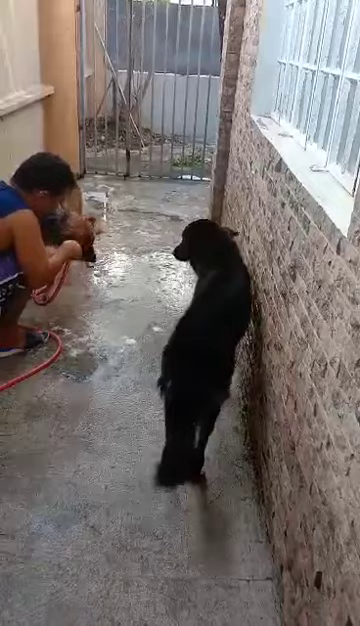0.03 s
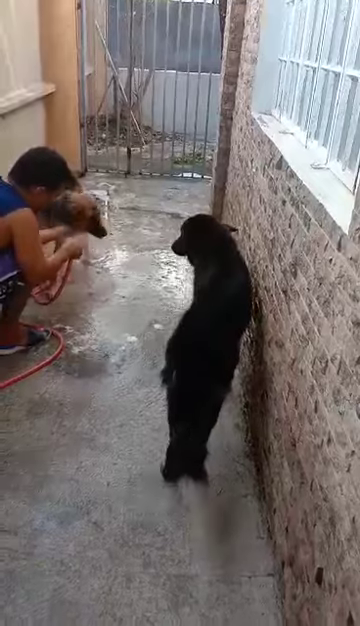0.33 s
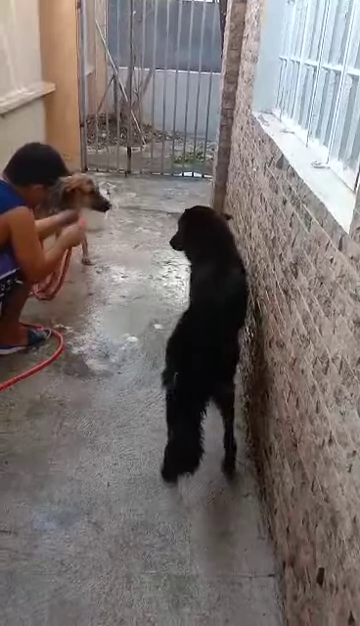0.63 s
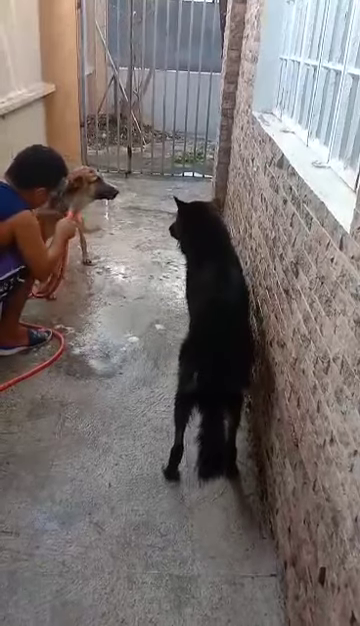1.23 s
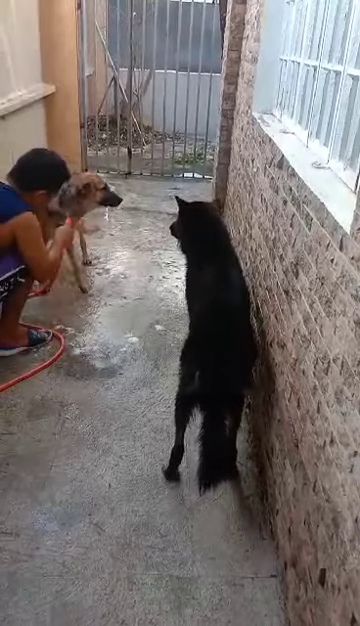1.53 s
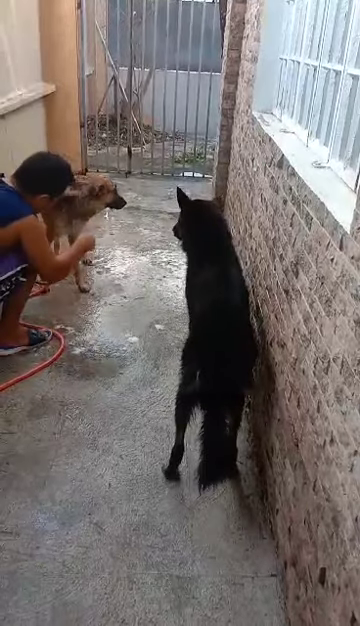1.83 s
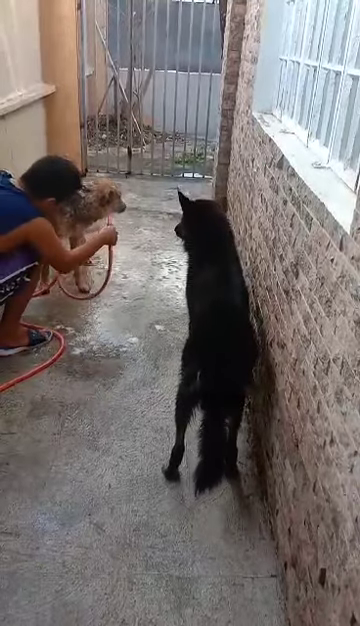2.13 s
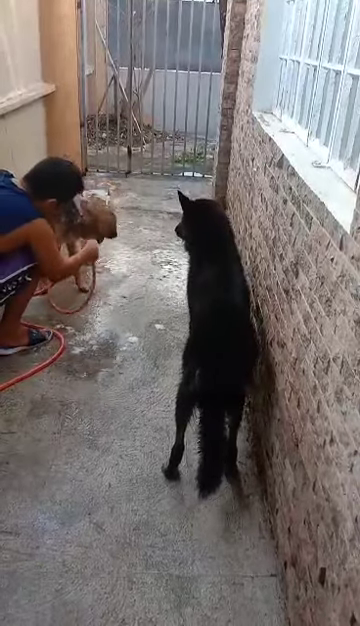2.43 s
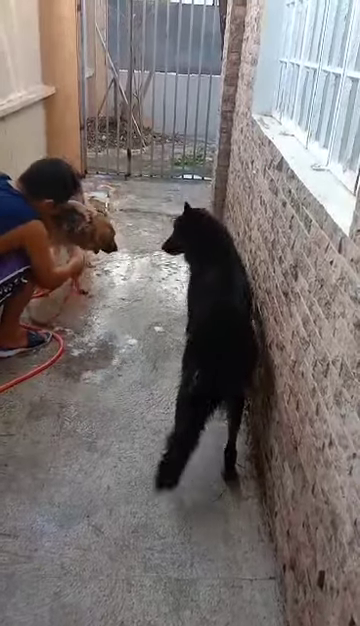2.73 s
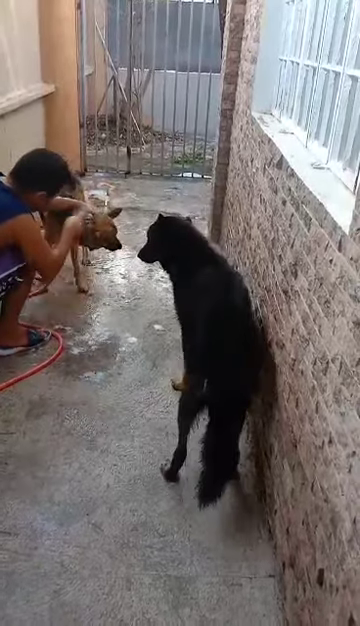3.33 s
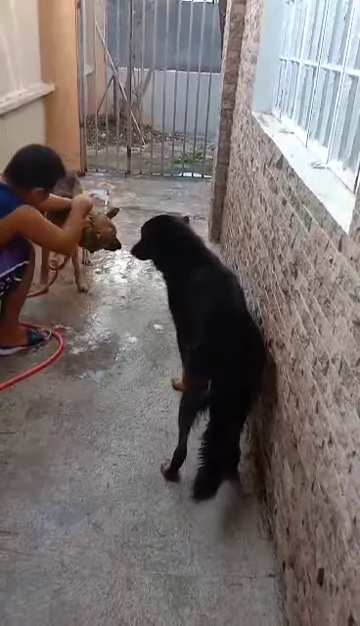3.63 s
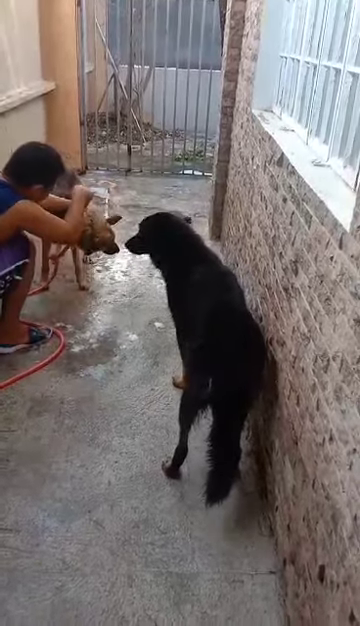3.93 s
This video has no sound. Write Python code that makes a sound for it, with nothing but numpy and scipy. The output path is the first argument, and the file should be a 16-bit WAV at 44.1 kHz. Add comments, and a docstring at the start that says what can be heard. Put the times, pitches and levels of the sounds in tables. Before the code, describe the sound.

Water spraying from a hose, hissing and splattering on a wet dog and concrete.

```python
"""Hosing a wet dog in a concrete yard

The spray hisses throughout: countless droplet impacts sum to noise. As the jet wanders over coat,
hand and ground it splatters, gargles and drums in surges, with impacts giving clicks and bubbles
ringing as damped oscillators. Close walls reflect the splashing and larger hollows resonate briefly.
A faint low hum comes and goes over a quiet outdoor background."""
import sys
import numpy as np
from scipy import signal
from scipy.fft import rfft, irfft
from scipy.io import wavfile
from scipy.ndimage import uniform_filter1d

SR = 44100
rng = np.random.default_rng(int(sys.argv[2]) if len(sys.argv) > 2 else 0)


def materialize(psi):
    """Save the field psi as 16-bit PCM at rate SR to the path in sys.argv[1].

    A 1-D psi becomes a single channel; in a 2-D psi each row is a channel.
    """
    bounded = np.clip(np.atleast_2d(psi).T, -1, 1)
    quanta = np.round(bounded * 32767).astype(np.int16)
    wavfile.write(sys.argv[1], SR, quanta)


N = 176400

# Reverberation time of the yard: frequency_hz, t60_s
YARD_DECAY = [(100, 0.18), (1000, 0.22), (3000, 0.39), (7000, 0.071), (13000, 0.52)]
# Stereo width of spray and mist, side relative to mid: frequency_hz, gain_db
SIDE_SPECTRUM = [(3600, -77), (4300, -24.5), (5200, -5), (6200, -4), (8000, -2), (11500, -2), (12600, -7),
                 (13000, -17)]
# Envelope of the fine spray: time_s, level_db
SPRAY_ENVELOPE = [(0.0, -32.5), (0.05, -30.5), (0.1, -33), (0.24, -32), (0.33, -38), (0.42, -33.5),
                  (0.5, -39), (0.59, -32), (0.95, -38), (1.22, -42), (1.33, -38), (1.7, -32.5), (1.92, -39),
                  (2.08, -36.5), (2.32, -38.5), (2.41, -28.5), (2.45, -32.5), (2.49, -30), (2.56, -34),
                  (2.62, -31.5), (2.74, -41), (2.94, -31), (3.02, -38.5), (3.09, -28.5), (3.14, -31),
                  (3.27, -32.5), (3.44, -36.5), (3.54, -34), (3.59, -31.5), (3.8, -30.5), (3.91, -31.5),
                  (4.0, -31.5)]
# Spectrum of the fine spray: frequency_hz, gain_db
SPRAY_SPECTRUM = [(1500, -28), (2900, -14.5), (3800, -9.5), (4600, -9), (5200, -0.5), (5600, 0), (6600, -1),
                  (7350, -6), (7750, -14), (9000, -23), (13000, -16.5)]
# Lower edge of the hiss, climbing as the spray thins: time_s, cutoff_hz
SPRAY_CUTOFF = [(0.62, 2900), (0.8, 4500), (1.0, 4640), (1.2, 5020), (1.36, 4340), (1.48, 2950),
                (1.9, 3400), (2.14, 4100), (2.31, 5000), (2.37, 3000)]
# Envelope of the finest mist: time_s, level_db
MIST_ENVELOPE = [(0.0, -32.5), (0.17, -37.5), (0.36, -34.5), (0.49, -42), (0.56, -37), (1.14, -41.5),
                 (1.69, -34.5), (1.91, -44.5), (2.02, -41.5), (2.28, -41), (2.43, -34.5), (2.6, -34),
                 (2.74, -45.5), (2.92, -40), (3.1, -36), (3.2, -36.5), (3.29, -33), (3.52, -40.5),
                 (3.68, -31.5), (4.0, -35.5)]
# Spectrum of the mist: frequency_hz, gain_db
MIST_SPECTRUM = [(3000, -45), (6500, -29), (7800, -10.5), (9000, -8.5), (10200, -5), (11800, -0.5),
                 (12500, 5), (13000, -4)]
# Splatter of the landing jet: time_s, level_db
SPLATTER_ENVELOPE = [(0.0, -33.5), (0.07, -34), (0.16, -38), (0.39, -44.5), (0.43, -37.5), (0.5, -52.5),
                     (0.61, -41), (0.88, -57), (1.08, -49), (1.15, -56), (1.38, -48.5), (1.49, -35.5),
                     (1.61, -38), (1.69, -37), (1.88, -43.5), (1.96, -40.5), (2.04, -50), (2.15, -47.5),
                     (2.28, -56), (2.39, -34.5), (2.52, -31.5), (2.61, -34.5), (2.74, -49.5), (2.92, -44.5),
                     (3.03, -44.5), (3.1, -33), (3.25, -30.5), (3.42, -39.5), (3.55, -36.5), (3.69, -32),
                     (3.85, -33.5), (3.9, -36.5), (4.0, -33.5)]
# Spectrum of the splatter: frequency_hz, gain_db
SPLATTER_SPECTRUM = [(900, -13), (1500, -3), (1900, -1.5), (2150, -3.5), (2400, -2.5), (2600, -2.5),
                     (2900, 1), (3400, 1), (3750, -1.5), (4250, -9.5), (4900, 2), (12000, -18)]
# Jet churning a pocket of water: time_s, relative_level_db, resonance_hz
GARGLE_CURVES = [(0.0, -37.5, 1380), (0.09, -34.5, 1410), (0.2, -46.5, 1460), (0.29, -39.5, 1330),
                 (0.48, -48, 1350), (0.58, -57, 1650), (0.75, -59, 1430), (1.25, -63, 1490),
                 (1.31, -42.5, 1570), (1.44, -58, 1540), (1.51, -43.5, 1110), (1.68, -46.5, 1360),
                 (1.78, -35, 1385), (1.93, -48.5, 1440), (1.97, -41.5, 1530), (2.05, -50.5, 1480),
                 (2.16, -46.5, 1420), (2.28, -54.5, 1680), (2.37, -41.5, 1380), (2.56, -39, 1670),
                 (2.6, -39, 1370), (2.67, -39, 1480), (2.78, -57.5, 1200), (2.9, -53, 1220),
                 (2.99, -41, 1360), (3.02, -49.5, 1240), (3.13, -34.5, 1460), (3.39, -38.5, 1324),
                 (3.44, -40, 1250), (3.49, -40, 1300), (3.58, -41.5, 1200), (3.78, -37, 1410),
                 (3.83, -33, 1310), (3.89, -42, 1270), (4.0, -35, 1300)]
# Heavy water on the coat: time_s, relative_level_db, resonance_hz
DRUMMING_CURVES = [(0.0, -45.5, 1010), (0.06, -38, 1030), (0.15, -56, 1080), (0.33, -50, 860),
                   (0.44, -68, 1110), (0.52, -62, 626), (0.59, -49.5, 637), (0.67, -63, 686),
                   (1.25, -66, 785), (1.43, -64.5, 1000), (1.67, -43.5, 890), (1.79, -47, 930),
                   (1.83, -65, 1020), (2.32, -65.5, 1040), (2.46, -41, 1010), (2.6, -39, 830),
                   (2.68, -65, 1040), (2.88, -63.5, 1020), (3.2, -39.5, 1090), (3.3, -39, 900),
                   (3.44, -54.5, 927), (3.52, -46.5, 900), (3.65, -38.5, 970), (3.78, -45.5, 700),
                   (3.84, -51, 1050), (3.88, -44.5, 960), (4.0, -43.5, 893)]
# Spectrum of the drumming bubbles: frequency_hz, gain_db
DRUMMING_SPECTRUM = [(120, -28), (300, -29), (450, -12.5), (600, 3.5), (750, 4), (950, 6), (1200, 8.5),
                     (1800, -3.5), (3000, -34)]
# Swells of the low hum: start_s, length_s, level_db
HUM_SWELLS = [(0, 0.16, -49), (1.785, .3, -50), (2.477, 0.28, -48), (2.964, 0.32, -48.5),
              (3.405, 0.094, -46), (3.547, 0.25, -49), (3.798, 0.23, -49.5)]
# Spectrum of the noise in the hum: frequency_hz, gain_db
HUM_SPECTRUM = [(20, -22), (45, -15), (65, 5), (90, 5), (115, 15), (170, -13), (300, -47), (900, -70)]
# Spectrum of the outdoor background: frequency_hz, gain_db
BACKGROUND_SPECTRUM = [(20, -31), (50, -18), (90, -2.5), (140, 4.5), (200, -1), (300, -10), (700, -14),
                       (1400, -42), (4000, -14), (14000, -38)]
# Moments when the splash turns hollow: start_s, length_s, centre_hz, gain_db
HOLLOW_BANDS = [(0.378, 0.14, 2070, -14.5), (0.61, 0.17, 2160, -11), (1.11, 0.13, 4300, 5),
                (1.79, 0.12, 2150, -6), (2.18, 0.21, 2450, -3), (2.695, 0.43, 2200, -6.5),
                (3.181, 0.07, 600, -7), (3.33, 0.092, 680, -7)]
# Hollows ringing under the jet: start_s, length_s, pitch_hz, width_hz, level_db
GLUG_RESONANCES = [(0.475, 0.2, 1550, 35, -46.5), (0.506, 0.1, 300, 201, -54),
                   (0.531, 0.15, 428, 26.2, -45.5), (0.554, 0.14, 3110, 70, -44.5),
                   (0.758, 0.077, 2860, 35, -51), (1.637, 0.16, 417, 150, -51),
                   (2.389, 0.074, 575, 70, -42), (2.39, 0.31, 428, 167, -50.5),
                   (2.864, .2, 1171, 34.8, -47), (2.88, 0.23, 686, 39.4, -50), (2.845, 0.21, 387, 120, -52),
                   (3.081, .1, 440, 152, -45), (3.235, 0.11, 483, 160, -49),
                   (3.384, 0.14, 467, 97.2, -55.5), (3.614, 0.26, 565, 50, -47),
                   (3.64, 0.52, 442, 100, -48), (3.958, 0.063, 1220, 50, -37)]


def amp(db):
    """Amplitude grows tenfold for every 20 decibels."""
    return 10 ** (np.asarray(db) / 20)


def unit(x):
    """Normalisation brings a signal to rms 1."""
    return x / np.sqrt(np.mean(x ** 2) + 1e-20)


def along(table):
    """Linear interpolation in time gives each column a value at every sample."""
    time_s, *columns = np.transpose(table)
    return [np.interp(np.arange(N) / SR, time_s, column) for column in columns]


def across(table, hz):
    """Interpolation on a log-frequency axis reads a table between its points."""
    points_hz, values = np.transpose(table)
    return np.interp(np.log(hz + 1), np.log(points_hz + 1), values)


def tint(x, spectrum):
    """Linear filtering multiplies each frequency by its own gain."""
    gain = amp(across(spectrum, np.fft.rfftfreq(2 * N, 1 / SR)))
    return irfft(rfft(x, 2 * N) * gain)[:N]


def wander(rate_hz):
    """Low-pass filtered noise is a smooth random fluctuation, here of rms 1."""
    low_pass = np.exp(-(np.fft.rfftfreq(N, 1 / SR) / rate_hz) ** 2)
    return unit(irfft(rfft(rng.standard_normal(N)) * low_pass, N))


def steady(x, samples=5000):
    """Division by the running rms removes slow level changes and leaves the fast grain."""
    power = uniform_filter1d(uniform_filter1d(x ** 2, samples), samples)
    return x / np.sqrt(abs(power) + 1e-20)


def resonate(x, hz, width_hz):
    """Two resonators in cascade, each width_hz wide, pass a steep band around a fixed or moving pitch."""
    carrier = np.exp(2j * np.pi * np.cumsum(hz * np.ones(N)) / SR)
    pole = np.exp(-np.pi * width_hz / SR)
    baseband = signal.lfilter([(1 - pole) ** 2], [1, -2 * pole, pole * pole], x / carrier + 1e-18)
    return (carrier * baseband).real


def drops(per_s, spread_db):
    """Independent impacts form a Poisson train of impulses, many small and a few large."""
    hits = rng.random(N) < per_s / SR
    return hits * rng.choice([-1., 1.], N) * amp(spread_db * np.minimum(rng.exponential(1, N), 4))


def yard(x, wet_db, patterns=7):
    """Wall reflections decay exponentially; cycling through echo patterns stands for the jet's motion."""
    shape = (patterns, SR // 2)
    echoes = rng.standard_normal(shape) * (rng.random(shape) < 2500 / SR)
    echoes *= np.arange(SR // 2) > .004 * SR  # travel time of the earliest reflection
    hz, t, spectra = signal.stft(echoes, SR, nperseg=256)
    decay = amp(-60 * t / across(YARD_DECAY, hz)[:, None])
    tails = signal.istft(spectra * decay, SR, nperseg=256)[1]
    place = np.arange(N) // (SR // 12) % patterns
    wet = sum(signal.oaconvolve(x * (place == k), tail / np.linalg.norm(tail))[:N]
              for k, tail in enumerate(tails))
    return unit(x + amp(wet_db) * wet)


def droplet_cloud(envelope, spectrum, per_s, clump_db):
    """Dense, clumped impacts sum to noise; independent mid and side signals give it width."""
    clumps = amp(clump_db * wander(rate_hz=27))
    mid, side = [steady(tint(yard(drops(per_s, spread_db=2.5) * clumps, wet_db=-5), spectrum))
                 for _ in range(2)]
    side = tint(side, SIDE_SPECTRUM)
    return amp(along(envelope)[0]) * np.array([mid + side, mid - side])


def spray():
    """Droplet noise loses its lower frequencies as the spray thins."""
    hiss = droplet_cloud(SPRAY_ENVELOPE, SPRAY_SPECTRUM, per_s=14000, clump_db=1.5)
    hz, t, spectra = signal.stft(hiss, SR, nperseg=512)
    cutoff_hz = np.interp(t, *np.transpose(SPRAY_CUTOFF))
    shelf_db = -14 * np.clip((cutoff_hz - hz[:, None]) / 280, 0, 1)  # full depth 280 Hz below cutoff
    return signal.istft(spectra * amp(shelf_db), SR, nperseg=512)[1][:, :N]


def mist():
    """The finest droplets radiate the highest frequencies, a sheen above the spray."""
    return droplet_cloud(MIST_ENVELOPE, MIST_SPECTRUM, per_s=12000, clump_db=2.5)


def bubbles(low_hz, high_hz, per_s, cycles, glide, spread_db, sizes=40):
    """Each bubble is a damped oscillator of slightly rising pitch, falling to 1/e in `cycles` periods."""
    out = np.zeros(N)
    for hz in np.geomspace(low_hz, high_hz, sizes) * rng.uniform(0.97, 1.02, sizes):
        age = np.arange(0, 5, hz / SR / cycles)  # in decay time constants
        ring = np.exp(-age) * np.sin(2 * np.pi * cycles * age * (1 + glide * age))
        out += hz * signal.oaconvolve(drops(per_s / sizes, spread_db), ring)[:N]
    return unit(out)


def folds(x, depth_db, width_hz, cap, last_s=0.11):
    """Folds of coat and films of water change shape, so resonances and dips come and go at random."""
    hz, t, spectra = signal.stft(x, SR, nperseg=1024, noverlap=768)
    lag_s = np.fft.fftfreq(len(hz), hz[1])[:, None]
    rate_hz = np.fft.fftfreq(len(t), t[1])
    smoothing = np.exp(-(lag_s * width_hz) ** 2 - (rate_hz * last_s) ** 2)
    ripple = np.fft.ifft2(np.fft.fft2(rng.standard_normal(spectra.shape)) * smoothing).real
    gain = amp(depth_db * np.minimum(unit(ripple), cap))
    return signal.istft(spectra * gain, SR, nperseg=1024, noverlap=768)[1][:N]


def splatter():
    """Impacts on wet coat and concrete radiate broadband clicks and leave small ringing bubbles."""
    slaps = unit(drops(per_s=4500, spread_db=4))
    fizz = bubbles(1711, 4538, per_s=1000, cycles=18.3, glide=0.007, spread_db=4)
    splash = yard(slaps + amp(-8) * fizz, wet_db=2.5)
    splash = folds(splash, depth_db=4, width_hz=170, cap=1.1)
    return amp(along(SPLATTER_ENVELOPE)[0]) * steady(tint(splash, SPLATTER_SPECTRUM))


def gargle():
    """Bubbles excite a pocket of water whose resonance shifts and wobbles as the hose moves."""
    level_db, hz = along(GARGLE_CURVES)
    churn = bubbles(1005.6, 1822, per_s=990, cycles=14.6, glide=0.012, spread_db=2.5)
    churn = folds(yard(churn, wet_db=-2), depth_db=4.5, width_hz=70, cap=1.3)
    note = resonate(churn, hz + 40 * wander(rate_hz=20), width_hz=280)
    return amp(level_db - 1.3) * steady(note, samples=1800)


def drumming():
    """Heavy water on the coat excites large, strongly damped bubbles and a gliding resonance."""
    level_db, hz = along(DRUMMING_CURVES)
    beats = bubbles(228.4, 1585, per_s=1500, cycles=5.8, glide=0.014, spread_db=3)
    beats = tint(yard(beats, wet_db=5), DRUMMING_SPECTRUM)
    body = steady(folds(beats, depth_db=12, width_hz=96, cap=1.3))
    note = steady(resonate(drops(per_s=1500, spread_db=4), hz, width_hz=260), samples=2500)
    return amp(level_db) * (amp(0.5) * body + amp(-7.5) * note)


def hum(pitch_hz=72, upper_hz=110, rise_s=0.0056, fall_s=0.04, sag_db_per_s=-35):
    """A tone, a narrow noise band and a rumble superpose in a rough hum that starts, sags and stops."""
    t, out = np.arange(N) / SR, np.zeros(N)
    rumble = amp(-7) * steady(tint(rng.standard_normal(N), HUM_SPECTRUM))
    upper_note = amp(-10) * steady(resonate(rng.standard_normal(N), upper_hz, width_hz=7))
    for start_s, length_s, level_db in HUM_SWELLS:
        age = np.maximum(t - start_s, 0)
        gate = np.minimum(age / rise_s, 1) * np.clip((length_s - age) / fall_s + .5, 0, 1)
        tone = np.sqrt(2) * np.sin(2 * np.pi * pitch_hz * age)
        out += amp(level_db + sag_db_per_s * age) * gate * (tone + upper_note + rumble)
    return out


def background(level_db=-58.5):
    """Stationary noise, strongest in the bass, forms the quiet outdoor floor."""
    return amp(level_db) * unit(tint(rng.standard_normal(N), BACKGROUND_SPECTRUM))


def hollowing(x):
    """Brief band filtering turns the splash hollow: one band sinks, or once rises, and returns."""
    hz, t, spectra = signal.stft(x, SR, nperseg=512)
    for start_s, length_s, centre_hz, gain_db in HOLLOW_BANDS:
        progress = np.clip((t - start_s) / length_s, 0, 1)
        swell = np.sqrt(abs(np.sin(np.pi * progress)))
        half_width_hz = 580 * np.sqrt(centre_hz / 2200)
        band = np.exp(-((hz[:, None] - centre_hz) / half_width_hz) ** 4)
        spectra *= amp(gain_db * swell * band)
    return signal.istft(spectra, SR, nperseg=512)[1][:N]


def glugs():
    """Cavity resonance: driven by the jet's noise, larger hollows ring briefly at their own pitches."""
    t, out = np.arange(N) / SR, np.zeros(N)
    for start_s, length_s, pitch_hz, width_hz, level_db in GLUG_RESONANCES:
        swell = np.sin(np.pi * np.clip((t - start_s) / length_s, 0, 1))
        ring = steady(resonate(rng.standard_normal(N), pitch_hz, width_hz), samples=2000)
        out += amp(level_db) * swell * ring
    return out


def scene():
    """Sound pressures add: spray and mist are spread in stereo, and all else is centred."""
    hiss = spray() + mist()
    splash = hollowing(splatter() + gargle() + drumming())
    return hiss + splash + glugs() + hum() + background()


def record(dry, cutoff_hz=13170):
    """A linear-phase low-pass filter limits the bandwidth."""
    low_pass = signal.firwin(1023, cutoff_hz, window=("kaiser", 9), fs=SR)
    return signal.oaconvolve(dry, low_pass[None], "same", axes=1)


dry = scene()
out = record(dry)
materialize(out)
```